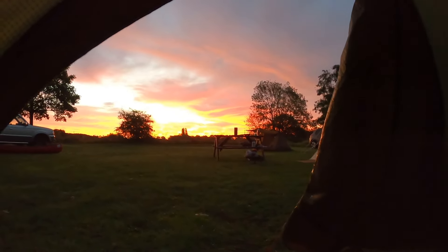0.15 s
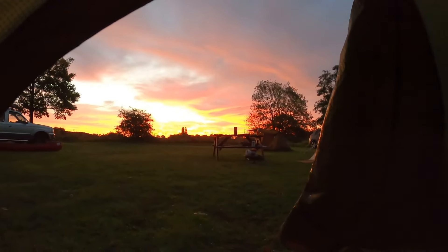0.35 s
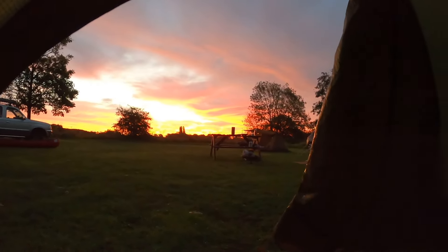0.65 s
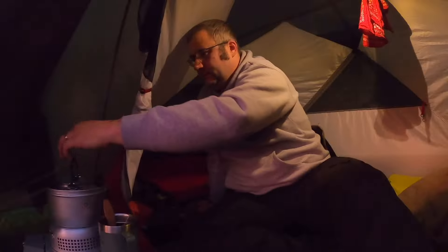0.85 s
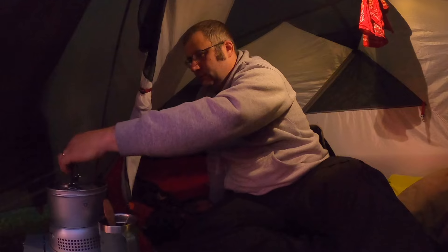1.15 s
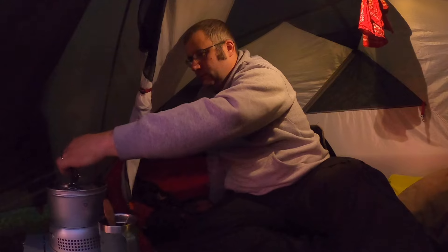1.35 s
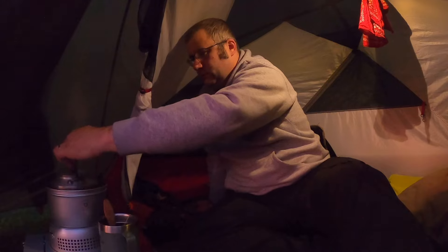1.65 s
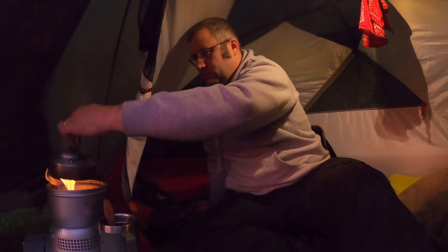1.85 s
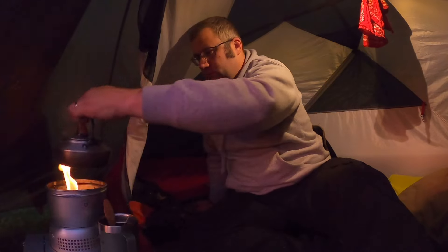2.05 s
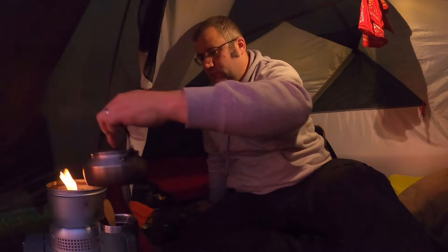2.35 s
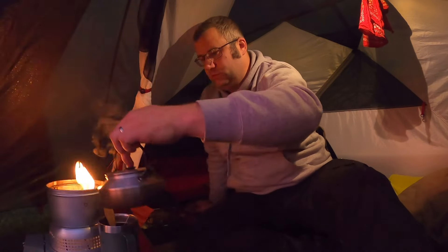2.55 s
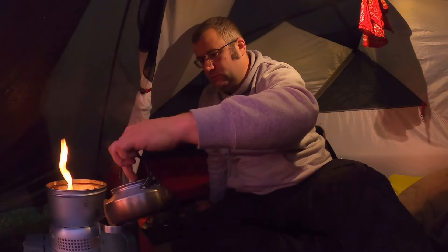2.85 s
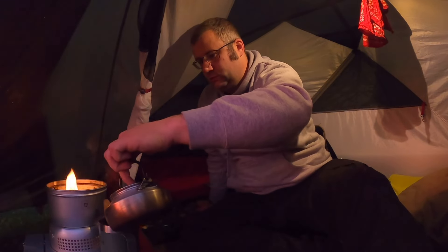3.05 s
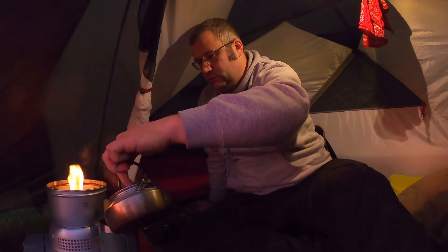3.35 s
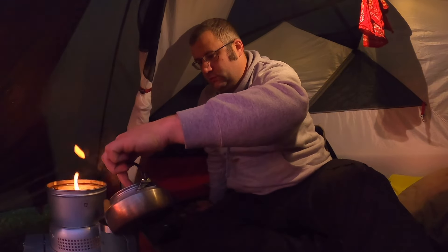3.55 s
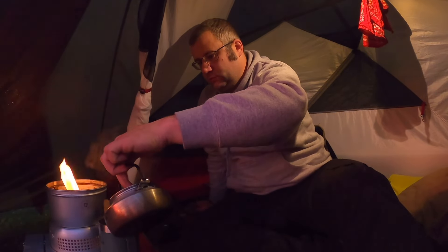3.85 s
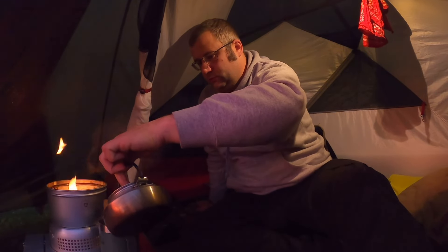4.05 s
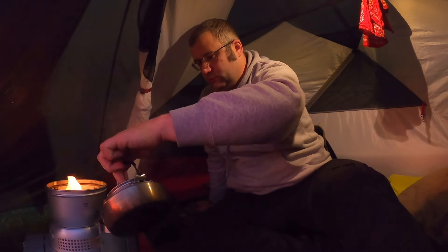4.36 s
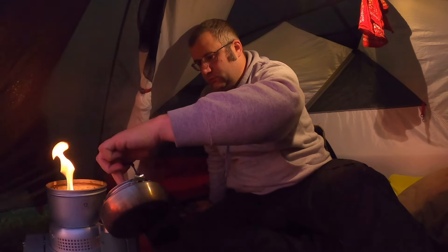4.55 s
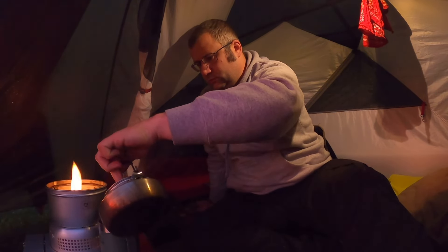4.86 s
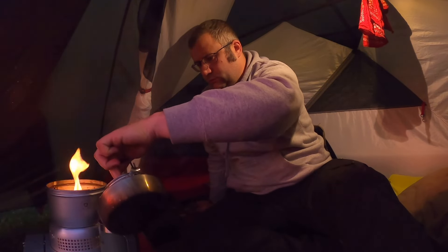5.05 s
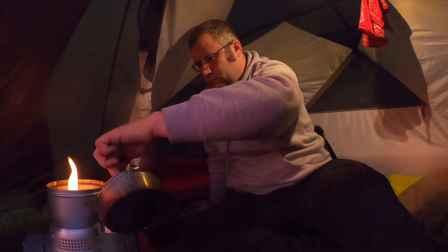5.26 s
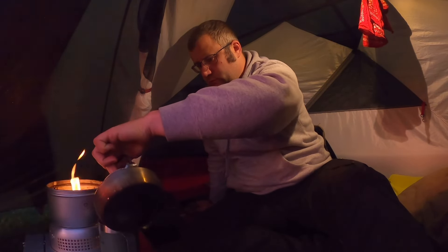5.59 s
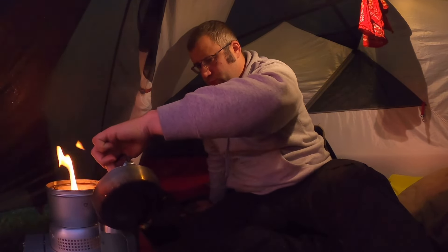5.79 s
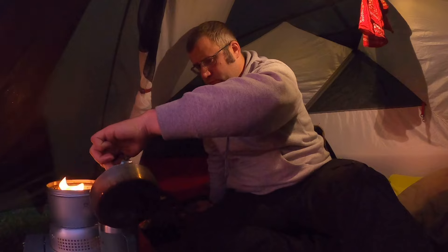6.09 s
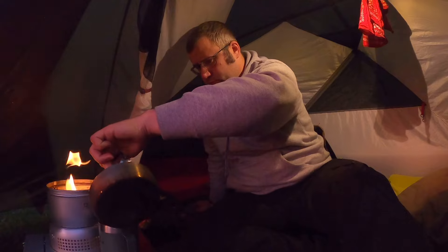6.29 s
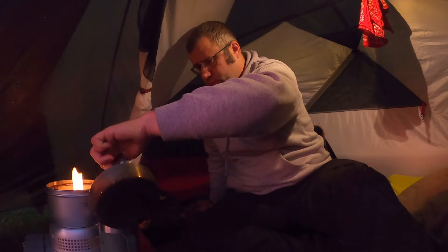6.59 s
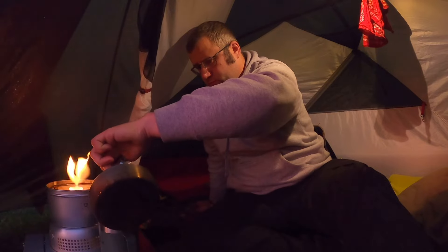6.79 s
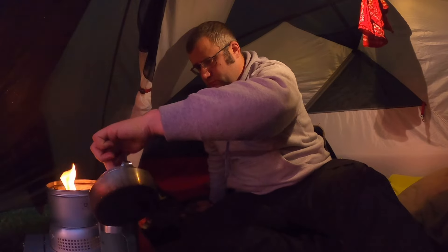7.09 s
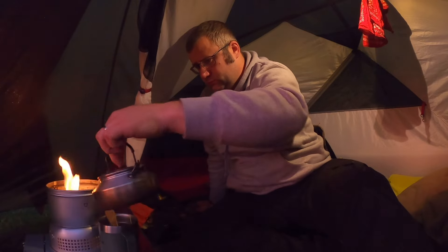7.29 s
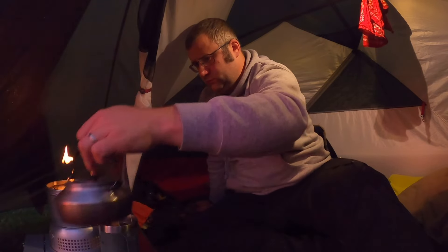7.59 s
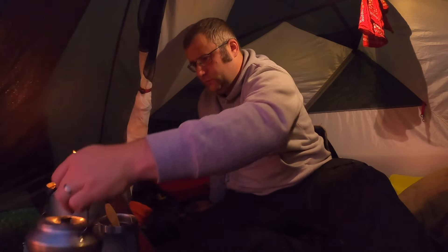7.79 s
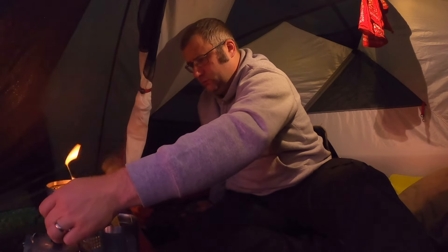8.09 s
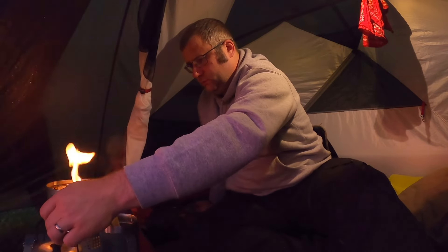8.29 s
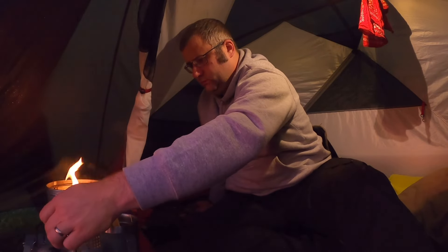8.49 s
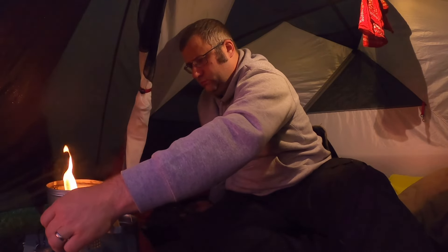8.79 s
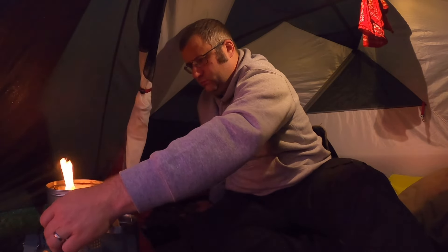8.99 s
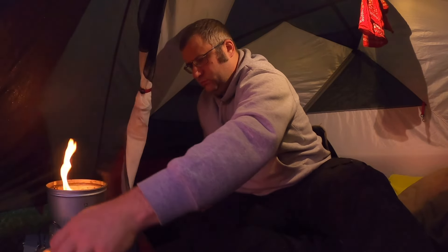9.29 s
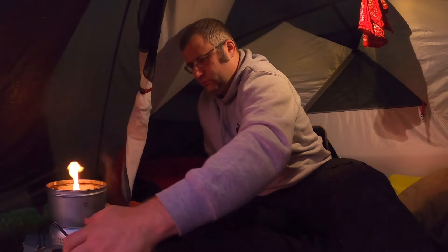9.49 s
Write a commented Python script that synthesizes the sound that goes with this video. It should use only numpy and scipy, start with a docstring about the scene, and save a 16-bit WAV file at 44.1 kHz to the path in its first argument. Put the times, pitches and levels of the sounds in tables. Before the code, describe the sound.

A close songbird gives a quick, high trill at the tent door, with a few soft, dull thumps on the floor. At 0.8 seconds an instant of silence leads inside, where a kettle simmers with a faint sizzle. Metal scuffs at 1.6 seconds, and the simmer fades by 2.5 as the stove flame flutters softly and low. A spoon clinks against a metal mug at 3.2 seconds. Water then splashes in unevenly, ringing the mug, strongest from 3.6 to 5.2 and thinning to stray drips until 7. The kettle knocks and sloshes lightly around 7.4 seconds, then is set down at 8.8 with a clank, the loudest sound, followed by small taps. Outside, birds whistle here and there, with faint caws around 2 to 3 and 6 to 7 seconds and a clearer falling song from 9. A distant road rumbles quietly throughout.

```python
"""A campsite at dawn: a songbird trills at the tent door, then, after a short silence, we are inside.
A kettle simmers on a spirit stove, tiny steam bubbles ringing its wall, and is lifted off the flame.
Water splashes into a metal mug with a spoon in it, ringing the metal and the air inside, and the kettle
is put down with a clank. Birds whistle and caw near and far, over the low rumble of a distant road."""
import sys
import numpy as np
from scipy import signal
from scipy.fft import rfft, irfft, next_fast_len
from scipy.io import wavfile
from scipy.ndimage import uniform_filter1d

SR = 44100
rng = np.random.default_rng(int(sys.argv[2]) if len(sys.argv) > 2 else 0)


def wav_record(signal):
    """Record a signal, one row per channel, as 16-bit PCM in the file named by sys.argv[1]."""
    frames = np.transpose(np.atleast_2d(signal))
    bounded = np.clip(frames, -1, 1)
    # unit amplitude maps onto the largest positive 16-bit level
    quanta = np.round(bounded * 32767).astype(np.int16)
    wavfile.write(sys.argv[1], SR, quanta)


N = 425124
TIME = np.arange(N) / SR
FFT_SIZE = next_fast_len(N)
BIN_HZ = np.fft.rfftfreq(FFT_SIZE, 1 / SR)
OCTAVE = np.log2(np.maximum(BIN_HZ, 1))
OUTSIDE_UNTIL_S, INSIDE_FROM_S = .763, .811

# the note of the air in the mug: t/s, f/Hz, width/Hz
MUG_AIR = [(3.1, 723, 90), (3.8, 826, 116), (4.4, 910, 155), (5.25, 1010, 171), (5.4, 636, 35),
           (5.9, 758, 25), (7.2, 815, 50)]


def from_db(db):
    """Turn decibels into a number to multiply by."""
    return np.exp(np.asarray(db) * (np.log(10) / 20))

def rms_one(x):
    """Scale a sound so that its average strength (rms) is 1."""
    return x / np.sqrt(np.mean(x ** 2) + 1e-20)

def in_time(rows):
    """Join points in time with straight lines, giving one curve per column."""
    s, *columns = np.transpose(rows)
    return [np.interp(TIME, s, c) for c in columns]

def add(out, s, sound):
    """Mix a short sound in at s seconds."""
    start = round(s * SR)
    out[start:start + len(sound)] += sound[:max(N - start, 0)]

def panned(x, left_db):
    """Make a sound left_db louder on the left than on the right."""
    return x * from_db(np.array([[left_db], [-left_db]]) / 2)

def narrowed(x, width):
    """Draw a stereo sound towards the middle."""
    mid = x.mean(axis=0)
    return mid + width * (x - mid)

def filtered(x, order, hz, kind="low"):
    """Keep only the low part, the high part or one band of a sound."""
    return signal.sosfilt(signal.butter(order, hz, kind, fs=SR, output="sos"), x)

def response(colour):
    """Gain at every frequency for a tone colour (rows of f/Hz, level/dB), falling fast past its ends."""
    hz, db = np.transpose(colour)
    octaves_outside = np.abs(OCTAVE - np.clip(OCTAVE, np.log2(hz[0]), np.log2(hz[-1])))
    return from_db(np.interp(OCTAVE, np.log2(hz), db) - 38 * octaves_outside)

def coloured(x, colour):
    """Give a sound a tone colour; rms 1."""
    return rms_one(irfft(rfft(x, FFT_SIZE) * response(colour), FFT_SIZE)[..., :N])

def noise(colour):
    """Stereo noise whose two sides are less alike in the treble; rms 1."""
    # how alike left and right are: f/Hz, likeness/0-1
    likeness = [(40, 0.85), (200, 0.94), (500, 0.42), (1400, 0.84), (4000, 0.21), (7000, 0.051),
                (14000, 0.13)]
    alike = np.clip(np.interp(BIN_HZ, *np.transpose(likeness)), 0, 1)
    mid, side = rfft(rng.standard_normal((2, FFT_SIZE)))
    pair = np.sqrt(1 + alike) * mid + np.sqrt(1 - alike) * side * [[1], [-1]]
    return rms_one(irfft(pair * response(colour), FFT_SIZE)[:, :N])

def drift(per_s):
    """A wandering curve that heads for a new random value per_s times a second."""
    points = rng.standard_normal(size=8000)
    return np.interp(TIME * per_s, np.arange(len(points)), points)

def grains(per_s, spread_db):
    """Random clicks of uneven size."""
    happens = rng.random(N) < per_s / SR
    size = from_db(spread_db * np.minimum(rng.exponential(1, N), 4))
    return happens * size * rng.choice([-1, 1], N)

def ring(clicks, hz, t60):
    """Each click starts a pure tone; t60 is the time in seconds it takes to fade by 60 dB."""
    r, w = from_db(-60 / (t60 * SR)), 2 * np.pi * hz / SR
    return signal.lfilter([0, np.sin(w)], [1, -2 * r * np.cos(w), r * r], clicks + 1e-18)

def fading(clicks, t60):
    """A loudness curve that jumps at each click and dies away."""
    return np.sqrt(signal.lfilter([1], [1, -from_db(-120 / (t60 * SR))], clicks ** 2 + 1e-24))

def resonance(x, hz, width_hz):
    """Let through what lies near one pitch; the narrower the band, the longer it rings."""
    r = np.exp(-np.pi * width_hz / SR)
    feedback = [1, -2 * r * np.cos(2 * np.pi * hz / SR), r * r]
    return signal.lfilter(np.array([1, 0, -1]) * (1 - r * r) / 2, feedback, x + 1e-18)

def pitched_noise(samples, hz, width_hz):
    """Noise narrowed to an unsteady note; rms 1."""
    return rms_one(resonance(resonance(rng.standard_normal(samples), hz, width_hz), hz, width_hz))

def echoes(x, t60, delay_s):
    """A blur of many echoes, different on each side."""
    t = TIME[:SR]
    tail = rng.standard_normal((2, SR)) * from_db(-60 * t / t60) * (t > delay_s)
    tail /= np.sqrt(np.sum(tail ** 2, axis=1, keepdims=True))
    return signal.fftconvolve(np.atleast_2d(x), tail, axes=1)[:, :N]


def far_road():
    """Distant traffic: a deep rumble, the drone of engines and the hiss of tyres."""
    # loudness of the rumble and of the engines: t/s, level/dB
    rumble_level = [(0, -58), (.75, -52.5), (1.3, -61.5), (2.5, -58.5), (3.6, -59.5), (4.1, -57),
                    (4.7, -58.5), (5.7, -53), (6.2, -58.5), (6.9, -53.5), (9.64, -60)]
    drone_level = [(0, -65.5), (.8, -63), (2.2, -64.5), (4.2, -66.5), (5.4, -63), (6.2, -63.5),
                   (8.0, -63.5), (8.8, -59.5), (9.64, -62)]
    # tone colours of the rumble, engines and tyres: f/Hz, level/dB
    rumble_colour = [(20, -3.5), (32, -9), (42, -10), (52, 6), (62, -7.5), (72, -4), (95, -9.5), (140, -18)]
    drone_colour = [(90, -22.5), (130, 3.5), (220, -2), (290, -5.5), (380, -16), (550, -25), (900, -24.5)]
    tyre_colour = [(450, -8), (850, -10.5), (1100, -3), (1290, 3.5), (1550, -5), (2000, -7), (2700, -14),
                   (4000, -20), (8000, -17)]
    rumble_db, drone_db = in_time(rumble_level) + in_time(drone_level)
    rumble = from_db(rumble_db + 3 * drift(14)) * noise(rumble_colour)
    drone = from_db(drone_db + 2.7 * drift(14)) * noise(drone_colour)
    tyres = from_db(np.where(TIME < OUTSIDE_UNTIL_S, -72.5, -71.5)) * noise(tyre_colour)
    return panned(rumble, -.92) + panned(drone, -1.3) + tyres

def dawn_chorus():
    """Many far birds blur into a high hiss, softer inside the tent; a few phrases swell out of it."""
    # tone colour of the chorus: f/Hz, level/dB
    colour = [(3000, -16), (4100, -8), (4800, 0), (5500, 2.5), (6800, -1.5), (7800, -31), (9000, -45)]
    # far phrases: middle t/s, half length/s, level/dB
    phrases = [(2.652, 0.35, -70.5), (3.5, 0.21, -66.5), (7.094, 0.56, -69)]
    steady = from_db(np.where(TIME < OUTSIDE_UNTIL_S, -66.5, -77.5))
    swells = sum(from_db(db) * np.exp(-((TIME - s) / half) ** 2) for s, half, db in phrases)
    return panned(np.hypot(steady, swells) * from_db(0.65 * drift(6.8)) * noise(colour), -.68)

def engine_hum():
    """One far engine swells and fades, humming on a few unsteady notes."""
    # the engine's notes: f/Hz, width/Hz, level/dB
    notes = [(141.4, 14, -9.5), (214.2, 12.8, 0), (283, 3, -7.5)]
    # its swell: t/s, level/dB
    level = [(6.5, -84), (7.5, -69), (8.2, -65.5), (8.9, -61), (9.3, -64.5), (9.64, -74)]
    hum_db, = in_time(level)
    hum = sum(from_db(db) * pitched_noise(N, hz, width) for hz, width, db in notes)
    return panned(from_db(hum_db) * hum, -2.2)

def song(notes, turn, waver, flutter_db, overtone_db=-62, sag=1.0):
    """Bird notes: nearly pure tones that glide through three pitches, bending at the share `turn`."""
    out, wobble, flutter = np.zeros(N), drift(500), drift(90)
    for s, length, start_hz, turn_hz, end_hz, db in notes:
        progress = np.linspace(0, 1, max(round(length * SR), 64))
        here = (round(s * SR) + np.arange(len(progress))) % N
        after_turn = np.maximum(progress - turn, 0) / (1 - turn)
        hz = np.interp(progress, [0, turn], [start_hz, turn_hz]) + (end_hz - turn_hz) * after_turn ** sag
        hz = uniform_filter1d(hz, size=len(hz) // 8) * (1 + waver * wobble[here])
        phase = 2 * np.pi * np.cumsum(hz) / SR
        swell = np.abs(np.sin(np.pi * progress)) ** 0.56 * from_db(db + flutter_db * flutter[here])
        add(out, s, swell * (np.sin(phase) + from_db(overtone_db) * np.sin(2 * phase)))
    return out

def jackdaw(glide_hz=(2400, 1900, 1280), length_s=0.031):
    """A far jackdaw's short, hoarse calls drop quickly in pitch and echo off the trees."""
    # calls: t/s, level/dB
    caws = [(2.148, -66), (2.696, -62), (2.985, -62), (5.723, -62.5), (5.911, -59), (6.096, -58.5),
            (6.283, -61), (6.49, -54.5), (6.8, -58)]
    notes = [(s, length_s, *glide_hz, db) for s, db in caws]
    tone = song(notes, turn=.45, waver=.09, flutter_db=2, overtone_db=-24)
    hoarse = tone * (.45 + .6 * from_db(1) * drift(800))
    return hoarse + from_db(0.5) * echoes(hoarse, 0.59, 0.0031)

def tree_birds(far_db=-63.5, field_edge_s=0.079):
    """Birds whistle in the trees: the fainter a note, the farther off, and the more of it is echo."""
    # whistles and a run of rising chirps: t/s, length/s, start f/Hz, turning f/Hz, end f/Hz, level/dB
    whistles = [(.81, 0.068, 5410, 5450, 5530, -52.5), (2.055, .03, 4680, 4850, 5260, -62),
                (2.09, 0.025, 5100, 5180, 5190, -53), (2.57, 0.11, 4740, 4840, 4600, -75),
                (2.98, 0.098, 7300, 7560, 7400, -74.5), (3.42, 0.083, 6050, 5850, 5860, -57),
                (3.44, 0.17, 5540, 5460, 5360, -58.5), (3.5, 0.112, 5820, 5760, 5760, -62),
                (3.345, 0.06, 5900, 6000, 6030, -67), (5.355, 0.011, 3350, 2800, 2190, -56),
                (5.615, 0.025, 3730, 3560, 2800, -70.5), (5.99, 0.022, 3800, 3430, 2650, -67.5),
                (6.26, 0.052, 5150, 5400, 5470, -73), (6.57, 0.086, 5200, 5300, 5350, -74),
                (7.51, 0.1, 6820, 6750, 6600, -68.5), (7.85, 0.14, 5620, 5410, 5190, -56),
                (8.32, 0.16, 4800, 4860, 4830, -72.5), (8.845, 0.051, 7850, 7780, 7500, -68),
                (8.972, 0.025, 4720, 4590, 4580, -63), (8.975, 0.12, 6520, 6700, 6850, -48.5),
                (9.09, 0.01, 6930, 6770, 6300, -57), (9.101, 0.08, 4840, 4550, 4630, -49.5),
                (9.155, 0.033, 4500, 4400, 4260, -49.5), (9.184, 0.018, 4250, 4020, 3850, -64),
                (9.197, 0.021, 3650, 3500, 3420, -53), (9.213, 0.057, 3450, 3547, 3506, -47),
                (9.253, 0.064, 3460, 3400, 3292, -48), (9.318, 0.062, 3430, 3350, 3310, -51),
                (9.376, 0.039, 3380, 3234, 3140, -48.5), (9.425, 0.029, 3230, 3240, 3360, -50),
                (9.385, 0.078, 3820, 3690, 3640, -58), (9.567, 0.018, 4780, 5700, 7700, -57),
                (9.584, 0.035, 7600, 7860, 7450, -59), (9.598, 0.015, 7340, 6400, 5150, -49),
                (9.62, 0.024, 7100, 7100, 7900, -47.5)]
    chirps = [(2.452, 0.051, 4970, 5240, 6030, -60.5), (2.6, 0.029, 4580, 4730, 5350, -55.5),
              (2.72, .04, 4380, 4950, 6520, -57), (2.84, 0.047, 4280, 5200, 7000, -58)]
    calls = song(whistles, turn=.35, waver=.004, flutter_db=1.6)
    calls += song(chirps, turn=.45, waver=.012, flutter_db=2, sag=1.3)
    strength = np.sqrt(np.abs(uniform_filter1d(calls ** 2, size=SR // 20)))
    nearness = strength / (strength + from_db(far_db))
    trees = from_db(4.5) * echoes(calls * (1.2 - nearness), 0.37, 0.004)
    field_edge_echo = from_db(-15) * np.interp(TIME - field_edge_s, TIME, calls)
    return panned(calls * (.5 + .5 * nearness), 5.2) + trees + field_edge_echo

def near_trill():
    """A close bird sings with two voices: each syllable is a high falling stroke, then a lower one."""
    # syllables: t/s, upper length/s, upper top f/Hz, upper end f/Hz, lower f/Hz, lower end f/Hz,
    # lower level/dB, rasp level/dB
    syllables = [(0.115, 0.04, 6640, 5500, 5040, 3870, -36, -53),
                 (0.226, 0.038, 6660, 5480, 4820, 3910, -37, -54),
                 (0.324, 0.035, 6170, 5600, 5760, 4100, -37, -53),
                 (0.431, 0.034, 6140, 5150, 4930, 4030, -40, -48),
                 (0.54, 0.04, 6050, 5050, 4800, 3730, -41.5, -48),
                 (0.649, 0.046, 6460, 5200, 5250, 4150, -40.5, -42.5)]
    strokes = [(0.032, 0.035, 4760, 5520, 3840, -42.5)]   # one arched note opens the trill
    sweeps, rasps = [], []
    for s, length, upper_hz, upper_end_hz, lower_hz, end_hz, db, rasp_db in syllables:
        join = s + length
        strokes.append((s, length + 0.002, .955 * upper_hz, upper_hz, upper_end_hz, db - 4))
        strokes.append((join, 0.021, 1.01 * lower_hz, lower_hz, end_hz, db))
        sweeps.append((join - 0.001, 0.009, 3880, 4450, 5200, db - 14))   # the second voice sweeps up
        rasps.append((join - 0.015, 0.038, 5820, 5370, 4910, rasp_db))   # the voices clash as they cross
    trill = song(strokes, turn=.18, waver=.005, flutter_db=1.3, sag=.85)
    trill += song(rasps, turn=.4, waver=.035, flutter_db=2, overtone_db=-50)
    trill += song(sweeps, turn=.4, waver=.025, flutter_db=2.5, overtone_db=-50)
    off_tent = from_db(-11) * echoes(trill, .03, .001)
    return panned(trill, -1.6) + off_tent + from_db(-7) * echoes(trill, 0.11, 0.0022)

def floor_thumps(ground_hz=60.6, ground_t60=0.51):
    """Soft knocks on the tent floor: the sheet gives a dull note and the ground booms under it."""
    # knocks: t/s, level/dB, f/Hz, t60/s, left minus right/dB
    thumps = [(0.19, -31.5, 226, 0.15, -24.5), (0.594, -54, 201.7, 0.57, -24.5),
              (0.664, -45, 210, 0.061, 36), (0.691, -28.5, 116.3, 0.069, -22), (0.729, -34, 36.1, 0.25, 23),
              (8.828, -34.5, 217, 0.074, -4)]
    out, t = np.zeros((2, N)), TIME[:SR // 2]
    for s, db, hz, t60, left_db in thumps:
        tone = np.sin(2 * np.pi * hz * t) + from_db(-8.5) * np.sin(2 * np.pi * 1.82 * hz * t)
        flap = resonance(rng.standard_normal(len(t)), hz * 0.5, hz * 0.85)
        flap = rms_one(resonance(flap, hz * 0.48, hz * 0.99))
        sheet = from_db(db - 60 * t / t60) * (1 - np.exp(-t / 0.0087)) * (0.76 * tone + 0.32 * flap)
        ground = from_db(db - 14 - 60 * t / ground_t60) * np.sin(2 * np.pi * ground_hz * t)
        for side, sound in zip(out, panned(sheet, left_db) + ground):
            add(side, s, sound)
    return filtered(out, 4, 520)

def flame_puffs(length_s=0.12, flutter_hz=76, waver=0.1407):
    """The spirit flame flares up now and then with a soft, deep flutter."""
    # flares: t/s, level/dB
    puffs = [(2.45, -52), (2.82, -52.5), (3.19, -50.5), (4.01, -54.5), (4.33, -50.5), (4.45, -54),
             (5.78, -49.5), (7.6, -52.5), (8.11, -53.5), (8.97, -47.5)]
    swell = sum(from_db(db) * np.exp(-(2 * (TIME - s) / length_s) ** 2) for s, db in puffs)
    phase = 2 * np.pi * np.cumsum(flutter_hz * (1 + waver * drift(54))) / SR
    return swell * np.sin(phase)

def simmering():
    """Tiny steam bubbles collapse on the kettle's hot base and ring its wall; the water booms softly."""
    # both die down off the flame; the sizzle revives as the kettle tilts: t/s, relative level/dB
    sizzle_level = [(.82, -72.5), (1.04, -74.5), (2.08, -79), (2.6, -88.5), (3.4, -91), (3.96, -83),
                    (4.3, -90), (4.85, -84.5), (6.2, -91), (8.7, -94.5), (9.0, -106), (9.64, -93)]
    boom_level = [(.8, -64), (1.5, -64), (1.9, -65), (2.3, -78.5), (2.8, -84)]
    # their tone colours: f/Hz, level/dB
    sizzle_colour = [(530, -37), (900, -17.5), (1140, -9), (1490, -13.5), (1620, -11.5), (2000, -8),
                     (3320, -10.5), (5450, -4.5), (7060, -4.5), (8130, -15), (12700, -20.5), (15000, -28)]
    boom_colour = [(200, 1.5), (330, -8.5), (470, -1), (600, -7.5), (760, -24.5)]
    # notes of the kettle's wall: f/Hz, width/Hz, relative level/dB
    wall_notes = [(2010, 69, 2), (2950, 120, 3), (4300, 51, -8), (5930, 130, 8), (7000, 35, -9)]
    sizzle_db, boom_db = in_time(sizzle_level) + in_time(boom_level)
    fizz = 1.2 * coloured(grains(5000, 2.3), sizzle_colour) + 0.3 * noise(sizzle_colour)
    wall = sum(from_db(db) * resonance(fizz, hz, width) for hz, width, db in wall_notes)
    sizzle = from_db(sizzle_db + 14) * panned(rms_one(fizz + 0.23 * wall), -0.25)
    boom = from_db(boom_db) * noise(boom_colour)
    return (sizzle + boom) * (TIME > INSIDE_FROM_S)

def sloshes(length_s=0.028, width_hz=330):
    """Water left in the kettle laps against its wall as it swings upright."""
    # laps: t/s, level/dB, f/Hz
    laps = [(7.35, -60, 920), (7.591, -56, 815)]
    out = np.zeros(N)
    swell = np.sin(np.linspace(0, np.pi, round(length_s * SR))) ** 2
    for s, db, hz in laps:
        add(out, s, from_db(db) * swell * pitched_noise(len(swell), hz, width_hz))
    return out

def metal(hits, notes, colour, ring_db, crack_db, crack_t60, contact_hz):
    """Each touch rings the metal's main notes, plus a crowd of short-lived ones heard as a crack."""
    s, db = np.transpose(hits)
    at, clicks, ringing = np.round(s * SR).astype(int), np.zeros(N), 0
    for k, (hz, note_db, t60) in enumerate(notes):
        clicks[at] = from_db(db + note_db + ring_db + rng.normal(0, 1, len(at)))
        ringing = ringing + (-1) ** k * ring(clicks, hz, t60)
    clicks[at] = from_db(db + crack_db)
    crack = uniform_filter1d(fading(clicks, crack_t60), size=24) * narrowed(noise(colour), 0.49)
    return filtered(ringing, 4, contact_hz) + crack

def base_thud(hits, hz=1210, width_hz=560):
    """Each hit gives the kettle's base one swing that dies almost at once."""
    s, db = np.transpose(hits)
    clicks = np.zeros(N)
    clicks[np.round(s * SR).astype(int)] = from_db(db + 4)
    swing = ring(clicks, hz, t60=np.log(1000) / (np.pi * width_hz))
    return filtered(swing, 2, [500, 4000], "band")

def kettle_air(build_s=0.003):
    """The air in the kettle answers each knock with a hollow note, lower as it comes upright."""
    # hollow notes: t/s, level/dB, f/Hz, t60/s
    notes = [(7.2805, -43.5, 716, 0.076), (7.407, -38.5, 678, 0.094)]
    out, t = np.zeros(N), TIME[:SR // 4]
    for s, db, hz, t60 in notes:
        add(out, s, from_db(db - 60 * t / t60) * (1 - np.exp(-t / build_s)) * np.sin(2 * np.pi * hz * t))
    return out

def kettle_and_spoon():
    """The kettle scuffs the stove, knocks on its handle and clanks down; the spoon clinks on the mug."""
    # moments when metal meets metal: t/s, relative level/dB
    scuffs = [(1.616, -48.5), (1.639, -41.5), (1.643, -53), (2.813, -58), (3.161, -58), (3.278, -54.5),
              (7.331, -50), (7.375, -57.5), (9.024, -65), (9.048, -60.5)]
    clinks = [(3.2085, -35), (3.216, -42)]
    knocks = [(7.281, -54.5), (7.405, -34.5)]
    clanks = [(8.8285, -24), (8.8322, -17), (8.8365, -26), (8.8392, -38), (8.8435, -23.5), (8.852, -34.5),
              (9.05, -56), (9.159, -51), (9.18, -55.5), (9.38, -56.5)]
    # the notes that each kind of touch rings: f/Hz, relative level/dB, t60/s
    scuff_notes = [(1543, 2, 0.067), (1920, -7, 0.16), (2550, 4, 0.054), (5900, -8, 0.089)]
    clink_notes = [(3557, -6.5, 0.057), (3940, -10, 0.16), (4350, -6.5, 0.15), (4510, -7.5, 0.13),
                   (5060, -11, 0.13), (5800, -16, 0.32), (7000, -15.5, 0.13), (9200, -31, 0.12)]
    knock_notes = [(1296, 8.5, 0.031), (1430, -5, 0.027), (1980, -8, 0.08), (2970, -10, 0.14),
                   (3080, -21, 0.17), (4460, -20, 0.19)]
    clank_notes = [(400, -16.5, 0.035), (645, -16, 0.054), (774, -10, 0.07), (918, -16, 0.16),
                   (1045, -4, 0.1), (1140, -18, 0.11), (1315, -9.5, 0.089), (1470, -4, 0.068),
                   (1510, -5.5, 0.082), (1950, -20, 0.13), (2760, -10, 0.029), (2920, -13, 0.073),
                   (3422, -26, 0.27), (3480, -24, 0.15), (4590, -34, 0.1), (6140, -31, 0.11)]
    # tone colours of their cracks: f/Hz, level/dB
    scuff_colour = [(410, -68), (700, -25), (1300, -6.5), (1550, 1), (1720, -1.5), (2340, -4.5),
                    (2490, -13), (3020, 0.5), (3610, -4.5), (5810, -2), (15000, -45)]
    clink_colour = [(1180, -62), (2000, -23), (3320, -19), (4380, 4), (4770, -21), (5230, -5), (13900, -45),
                    (15000, -51)]
    knock_colour = [(240, -30), (370, -9), (977, -14), (1260, 0), (2210, -17), (2890, -7), (3780, -18),
                    (5480, -19.5), (14000, -54)]
    clank_colour = [(88, -61), (150, -28.5), (434, -5), (566, -31), (1040, -3), (1360, 2.5), (1610, -15.5),
                    (2630, -8), (3190, -15.5), (6810, -16.5), (8230, -33.5), (12500, -62), (14000, -89)]
    out = metal(scuffs, scuff_notes, scuff_colour,
                ring_db=-8.5, crack_db=2, crack_t60=0.078, contact_hz=7000)
    out += metal(clinks, clink_notes, clink_colour,
                 ring_db=-2, crack_db=-5.5, crack_t60=0.14, contact_hz=11000)
    out += metal(knocks, knock_notes, knock_colour,
                 ring_db=-6.5, crack_db=-5, crack_t60=0.076, contact_hz=5400)
    out += metal(clanks, clank_notes, clank_colour,
                 ring_db=-8.5, crack_db=-3.5, crack_t60=0.035, contact_hz=6400)
    out += base_thud(clanks) + kettle_air()
    return panned(out, 1.1) + from_db(-20.5) * echoes(out, 0.2, 0.0012)

def mug(x, fill, damping=0.016):
    """A sound in the mug rings its wall; more water (fill, 0-1) stops the ringing sooner."""
    # notes of the empty mug: f/Hz, width/Hz, level/dB
    notes = [(1490, 70, 2.5), (2087, 60, -9), (2270, 14, 2), (2650, 63, -3), (2723, 43, 5), (4190, 28, 6.5),
             (3970, 450, -1.5), (4500, 30, 4), (5100, 120, -6), (5790, 100, 6)]
    wall = sum(from_db(db) * resonance(x, hz, width + damping * hz * fill) for hz, width, db in notes)
    return 0.84 * x + wall

def bubbles(per_s=110, cycles=35, rise=0.065):
    """Small bubbles of many sizes, each rising in pitch as it dies; rms 1."""
    out, births = np.zeros(N), grains(per_s, 2.1)
    for at in np.flatnonzero(births):
        hz = np.exp(rng.uniform(np.log(1100), np.log(5000)))
        age = np.linspace(0, 1, round(cycles * SR / hz))
        tone = np.sin(2 * np.pi * cycles * age * (1 + rise * age))
        add(out, at / SR, births[at] * tone * from_db(-45 * age) * np.minimum(age * 20, 1))
    return rms_one(out)

def mug_air(block=2048):
    """Each drop briefly rings the air in the mug, whose pitch shifts during the pour; rms 1."""
    hz, width_hz = in_time(MUG_AIR)
    spin = np.exp(2j * np.pi * np.cumsum(hz) / SR)
    # take the gliding pitch out, give each drop a fading tail, then put the pitch back
    drops, state = grains(350, 3.2) / spin, [0j]
    for i in range(0, N, block):
        r = np.exp(-np.pi * width_hz[i] / SR)
        part = slice(i, i + block)
        drops[part], state = signal.lfilter([np.sqrt(1 - r * r)], [1, -r], drops[part] + 1e-18, zi=state)
    air = filtered((drops * spin).real, 4, 650, "high")
    return rms_one(resonance(air, 810, 680))

def splashes(t60=0.047, fill_from_s=5, fill_s=1.5):
    """Each splash is a snap and a burst of noise that ring the mug, mostly at one pitch, and its air."""
    # big splashes: t/s, level/dB, then against that gulp/dB, slap/dB, spatter/dB; strongest ring f/Hz
    events = [(3.442, -48, -20, -15, -8.5, 3140), (3.523, -42.5, -19, -4.5, -16, 2090),
              (3.601, -49.5, -28, -4, -8, 2300), (3.649, -37, -24, -5, -10, 2630),
              (3.658, -37, -12.5, -5, -15, 2240), (3.673, -45, -23, -7, -13, 2140),
              (3.693, -40, -20, -15, -10, 4100), (3.704, -42.5, -18.5, -14, -8, 4300),
              (3.732, -44, -21, -8, -11, 2640), (3.749, -45, -18, -5.5, -23, 2130),
              (3.775, -39.5, -19, -8.5, -13, 2120), (3.792, -47, -17, -9, -14, 2110),
              (3.824, -42.5, -19, -9, -15, 2580), (3.878, -40, -5, -14, -21, 1420),
              (3.92, -31, -8, -23.5, -28, 910), (3.931, -49, -10, -19, -18, 1500),
              (4.019, -39, -21, -7.5, -16.5, 2200), (4.066, -44.5, -29, -16, -9, 2530),
              (4.091, -48, -19, -5, -12, 1880), (4.12, -39, -21, -9.5, -13, 2670),
              (4.151, -48, -16, -21, -6.5, 1335), (4.163, -48, -9, -22, -20, 1530),
              (4.199, -52, -13, -11, -17, 2720), (4.255, -44.5, -5, -25, -31, 937),
              (4.292, -50.5, -1, -23, -23, 894), (4.319, -41, -7.5, -16.5, -32, 840),
              (4.349, -43.5, -13, -15, -11, 851), (4.41, -55.5, -21, -19, -4, 4100),
              (4.452, -36.5, -6.5, -13.5, -25, 890), (4.518, -41.5, -15, -12, -11.5, 2600),
              (4.575, -41.5, -14, -9, -23, 2580), (4.617, -59, -21, -6, -22, 2770),
              (4.661, -52, -8, -12, -14, 1010), (4.683, -49, -7, -21, -20, 1540),
              (4.7, -47, -7, -20, -17, 1320), (4.833, -47.5, -14, -10, -11.5, 1500),
              (4.861, -50.5, -12, -7, -9, 2740), (4.879, -46.5, -10, -21, -10, 1020),
              (5.066, -40.5, -10, -12.5, -14, 1090), (5.113, -42, -19, -10.5, -10, 4400),
              (5.153, -47, -17, -10, -12, 2735), (5.209, -46.5, -9, -9, -22, 2760),
              (5.487, -46.5, -12, -14, -12, 2780), (5.855, -47.5, -15, -9, -12, 2100),
              (6.742, -40.5, -23, -19, -17, 3250), (7.052, -50, -8, -8, -15, 1314)]
    # the ranges of gulp, slap and spatter: low f/Hz, high f/Hz, gain/dB
    bands = [(743, 1810, -6.5), (1800, 2880, -7.5), (3430, 6900, -7.5)]
    out, t = np.zeros(N), TIME[:SR // 6]
    air_s, air_hz, air_width = np.transpose(MUG_AIR)
    for s, db, *parts_db, ring_hz in events:
        burst = rng.standard_normal(len(t)) * from_db(-60 * t / t60)
        burst[:4] += 2.2   # the snap
        fill = np.clip((s - fill_from_s) / fill_s, 0, 1)
        for part_db, (low, high, band_db) in zip(parts_db, bands):
            hit = filtered(burst, 3, [low, high], "band")
            air = resonance(hit, np.interp(s, air_s, air_hz), np.interp(s, air_s, air_width))
            sound = mug(hit, fill) + 1.6 * air + 5 * resonance(hit, ring_hz, width_hz=85)
            add(out, s, from_db(db + part_db + band_db) * sound / np.std(sound[:SR // 50]))
    return out

def pouring(start_s=3.15, end_s=7.25, spurt_db=3.5):
    """An uneven stream patters in the mug and stirs its air; single hard drops tick on the bare metal."""
    # the stream builds, holds, then thins to a dribble; the air rings along: t/s, relative level/dB
    stream_level = [(3.15, -68), (3.45, -71), (3.72, -60.5), (4.0, -65.5), (4.5, -67.5), (4.9, -63),
                    (5.02, -73), (5.15, -64), (5.3, -69), (5.5, -64), (5.7, -74), (6.4, -100), (7.2, -78)]
    air_level = [(3.16, -56.5), (3.29, -61), (3.38, -76), (3.9, -64.5), (4.05, -76), (4.25, -64),
                 (5.15, -73.5), (5.8, -74), (6.3, -90)]
    # tone colours of the patter and the hard drops: f/Hz, level/dB
    patter_colour = [(700, -3), (1100, 3), (1500, 6.5), (2100, 5), (2700, 6.5), (3400, -1), (4300, 2),
                     (5200, -9), (6200, 4), (8300, -43), (12500, -28), (15000, -36)]
    tick_colour = [(1500, 2), (2700, -6.5), (4400, -3), (6500, 3.5), (8500, -12.5), (13000, -14),
                   (15000, -22)]
    air_db, stream_db = in_time(air_level) + in_time(stream_level)
    flowing = uniform_filter1d(1. * ((TIME > start_s) & (TIME < end_s)), size=SR // 50)
    strength = flowing * from_db(stream_db + spurt_db * drift(16))
    patter = 0.48 * coloured(grains(260, 3.2), patter_colour) + 0.47 * bubbles()
    out = mug(strength * patter, fill=0.39) + splashes()
    out += flowing * from_db(air_db - 5 + 2 * drift(13)) * mug_air()
    ticks = rms_one(fading(grains(38, 1.5), t60=0.057) * noise(tick_colour))
    return panned(out, 0.56) + from_db(-14.5) * echoes(out, 0.14, 0.0078) + strength * from_db(-5.5) * ticks

def scene():
    """The outdoors and the tent together."""
    outside = far_road() + dawn_chorus() + engine_hum() + near_trill() + tree_birds() + jackdaw()
    tent = floor_thumps() + simmering() + flame_puffs() + pouring() + sloshes() + kettle_and_spoon()
    return outside + tent

def record(dry, top_hz=15688):
    """A moment of silence parts the outside from the inside; the highest treble is removed."""
    audible = uniform_filter1d(1. * ((TIME < OUTSIDE_UNTIL_S) | (TIME > INSIDE_FROM_S)), size=24)
    return signal.sosfilt(signal.cheby2(12, 70, top_hz, fs=SR, output="sos"), dry * audible)


dry = scene()
out = record(dry)
wav_record(out)
```